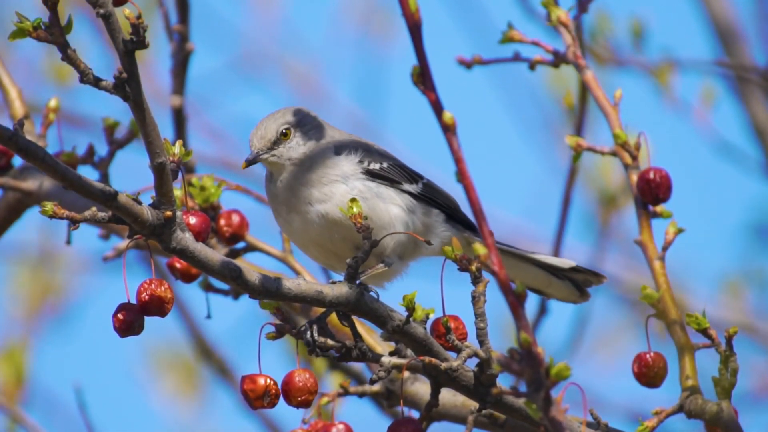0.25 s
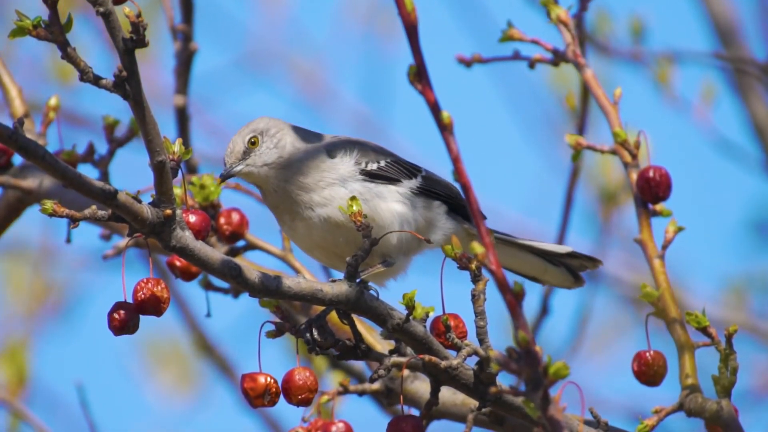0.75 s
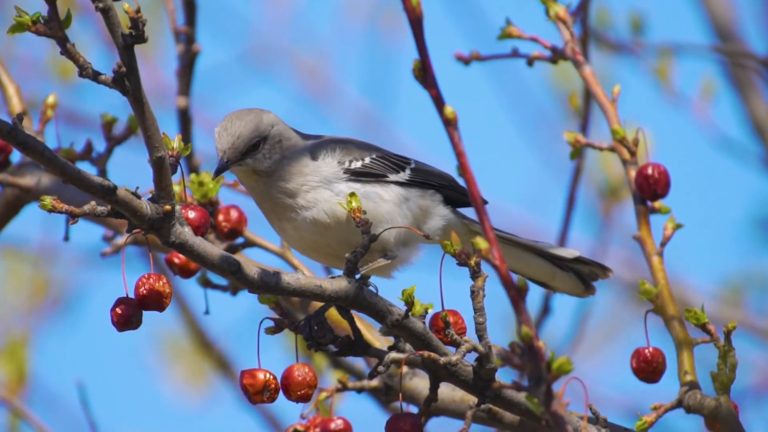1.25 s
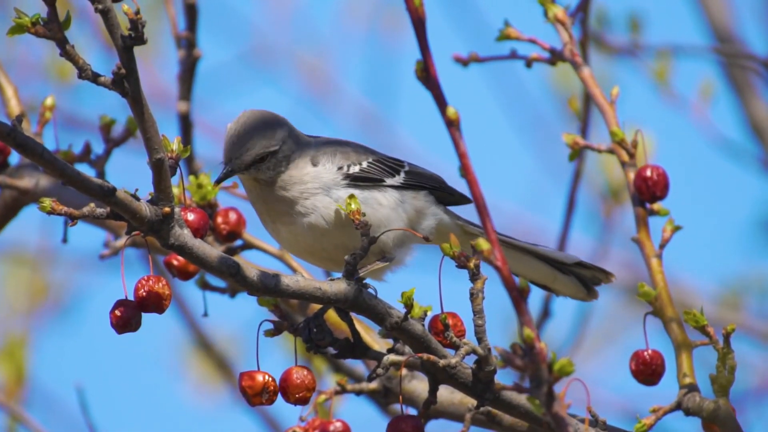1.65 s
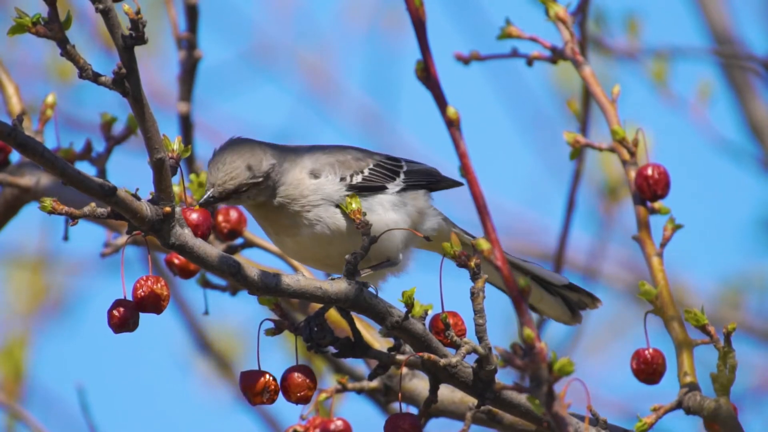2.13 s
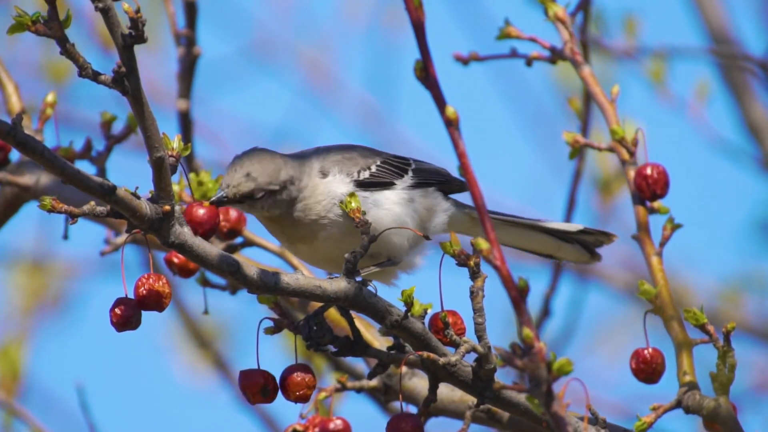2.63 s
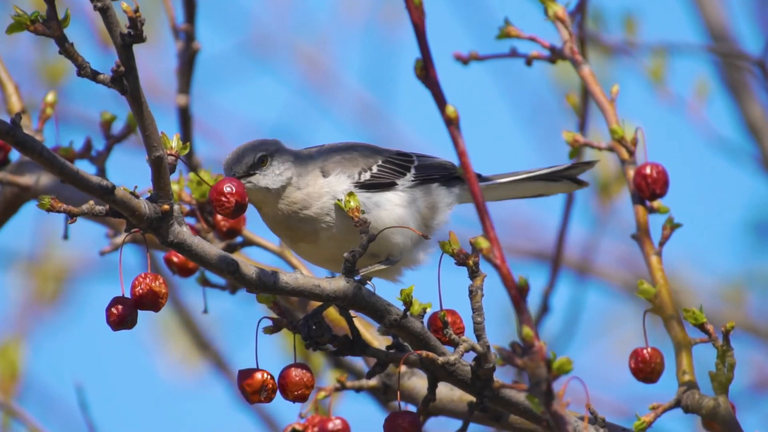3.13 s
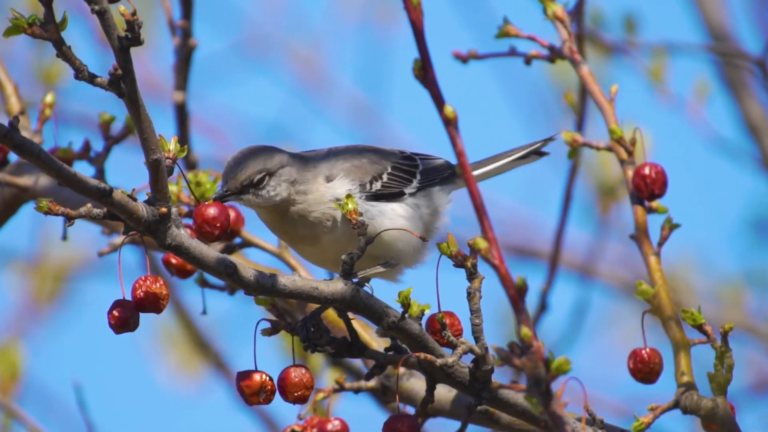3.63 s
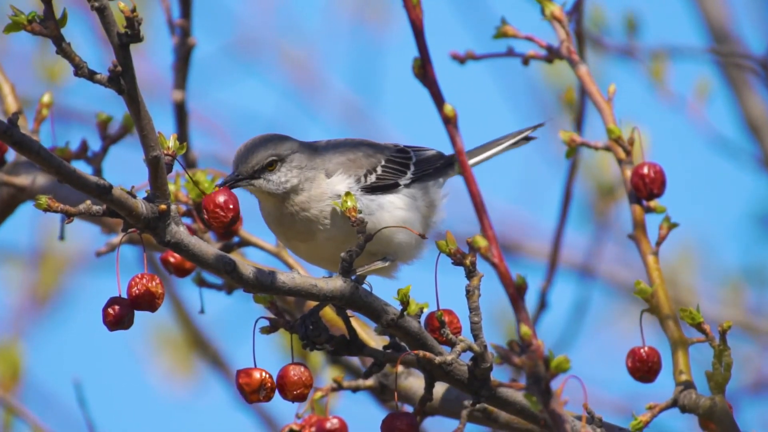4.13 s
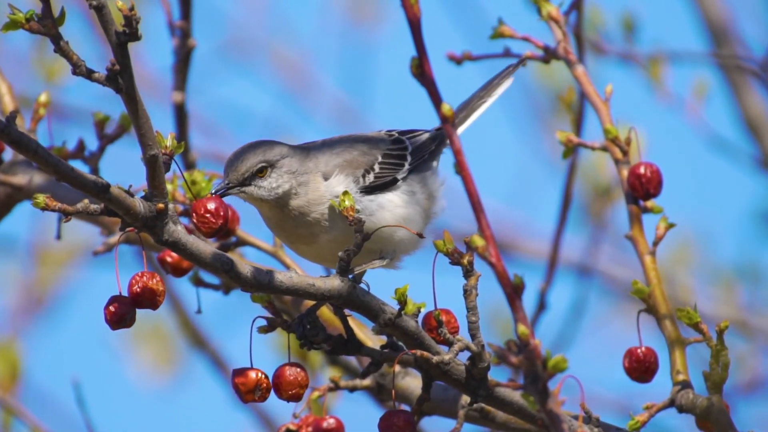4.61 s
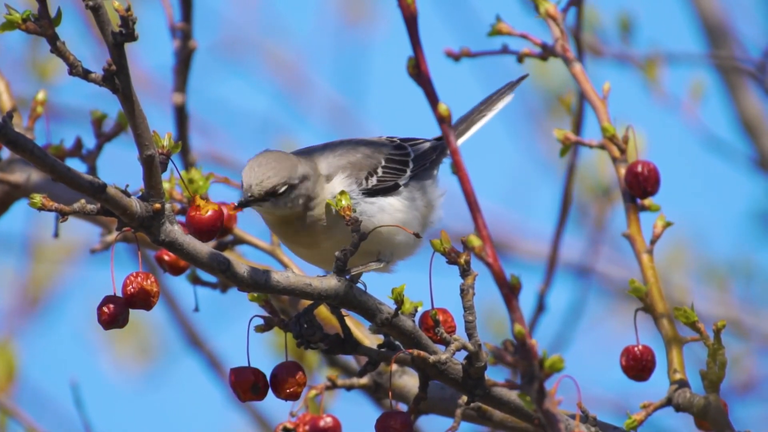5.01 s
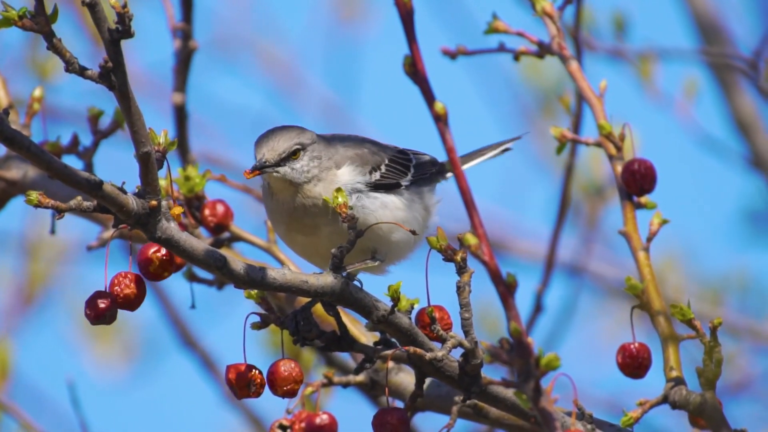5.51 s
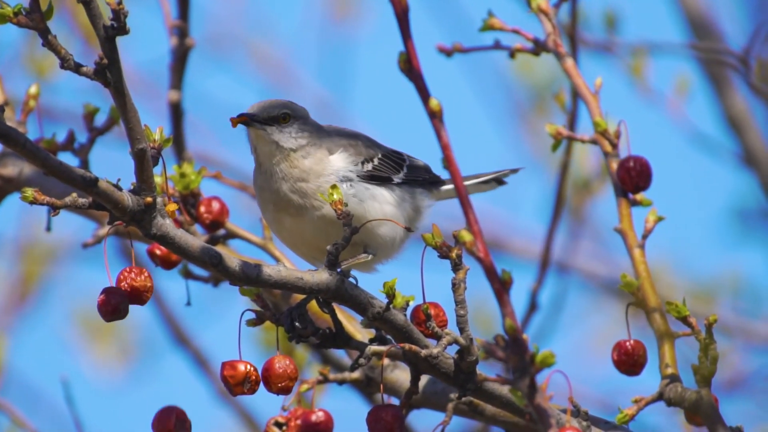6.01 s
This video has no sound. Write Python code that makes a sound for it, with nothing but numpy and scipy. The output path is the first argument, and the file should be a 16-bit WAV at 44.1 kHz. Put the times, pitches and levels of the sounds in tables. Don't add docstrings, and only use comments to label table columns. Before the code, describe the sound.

A grey songbird perched close and central sings clear, quick whistles: low paired slurs with higher answers, then cleaner falling slides, then a run of upward-flicked notes, paused once. Near twigs and trunks give a light echo. Crickets trill steadily on both sides over a high insect hiss and faint low air. Soft rodent chucks, distant wooden knocks and thin far bird calls sit behind, in natural open stereo.

```python
import sys
import numpy as np
from scipy import signal
from scipy.fft import rfft, irfft, next_fast_len
from scipy.io import wavfile
from scipy.ndimage import uniform_filter1d, map_coordinates

SR = 44100
rng = np.random.default_rng(int(sys.argv[2]) if len(sys.argv) > 2 else 0)


def convert_level_to_amplitude(level_db):
    exponent = np.asarray(level_db, float) / 20
    return 10 ** exponent


def master_out(mix):
    frames = np.transpose(np.atleast_2d(mix))
    ceiling = np.clip(frames, -1, 1)
    pcm = np.round(ceiling * 32767).astype(np.int16)
    wavfile.write(sys.argv[1], SR, pcm)


N = 276066

# share of length, height (1 first pitch, 0 last), level_db re note
FAR_SHAPE = [(0, 0.85, 0.5), (.3, 0.47, -1), (.75, 0.62, -4), (1, 0.0, -3)]


def at_hz(points, hz):
    point_hz, value = np.transpose(points)
    return np.interp(np.log(hz), np.log(point_hz), value)


def pan(x, lean_db):
    return x * convert_level_to_amplitude(np.array([[lean_db], [-lean_db]]) / 2)


def add(out, start_s, sound):
    i = round(start_s * SR)
    sound, i = sound[max(-i, 0):], max(i, 0)
    out[i:i + len(sound)] += sound[:max(len(out) - i, 0)]


def butter(x, order, hz, kind):
    return signal.sosfilt(signal.butter(order, hz, kind, fs=SR, output="sos"), x)


def drift(rate):
    slow = rng.standard_normal(int(N / SR * rate * 2) + 3)
    return map_coordinates(slow, [np.arange(N) / SR * rate * 2], order=3, mode="nearest")


def scatter(x, t60, level_db, gap_s, channels, lumpy_db=0):
    t = np.arange(SR) / SR
    echo = rng.standard_normal((channels, SR))
    clumps = uniform_filter1d(uniform_filter1d(echo, size=500), size=500)
    decay_db = lumpy_db * clumps / np.std(clumps) - 60 * t / t60
    echo = echo * convert_level_to_amplitude(decay_db) * np.clip(t / gap_s - 1, 0, 1)
    echo *= convert_level_to_amplitude(level_db) / np.sqrt(np.sum(echo ** 2, axis=1, keepdims=True))
    return signal.fftconvolve(x[None], echo, axes=1)[:, :N]


def blip(hz, length_s, fall):
    u = np.linspace(0, 1, int(length_s * SR))
    glide_hz = hz * (1 + fall * (.5 - u))
    return np.sin(np.pi * u) ** 2 * np.sin(2 * np.pi * np.cumsum(glide_hz) / SR)


def sung(shape, rows):
    notes = []
    for s, length_s, first_hz, last_hz, level_db in rows:
        notes.append([(s + share * length_s, last_hz + height * (first_hz - last_hz), level_db + db)
                      for share, height, db in shape])
    return notes


def whistle(notes, overtone_db, rasp_db, tilt_db=0, effort=None, held_db=0):
    # multiple, level_db re pitch
    overtones = [(2, -25), (3, -33), (4, -35), (5, -32.5), (6, -34.5), (7, -28)]
    # hz, gain_db
    beak = [(3000, -1), (4600, -4), (5400, -6), (6100, -9), (7400, -1), (12000, 1), (14800, -0.5),
            (15300, -2)]
    out = np.zeros(N)
    for note, (fade_db, arch_db, bright_db, octave_db) in zip(notes, effort or [(0, 0, 0, 0)] * len(notes)):
        s, pitch_hz, level_db = np.transpose(sorted(note))
        t = np.arange(s[0], s[-1], 1 / SR)
        u = (t - s[0]) / (s[-1] - s[0]) - .5
        hz = uniform_filter1d(np.interp(t, s, pitch_hz), size=24, mode="nearest")
        phase = 2 * np.pi * np.cumsum(hz) / SR

        linger = np.exp(-1 / (0.029 * SR))
        shaken = signal.lfilter([1 - linger], [1, -linger], np.abs(np.gradient(hz)))
        noise = rng.standard_normal(SR // 8)[:len(t)]
        flutter = 4 * signal.lfilter(*signal.butter(2, 1300, fs=SR), noise)
        rasp = convert_level_to_amplitude(rasp_db) * shaken * flutter
        tone = (1 + rasp) * np.sin(phase)

        wobble_rad = .3 * uniform_filter1d(flutter, size=200)
        note_db = np.interp(t, s, level_db)
        swing_db = .4 * (note_db - level_db.max() + 1.0)
        still = np.exp(-shaken / .1)
        for k, db in overtones:
            patches = np.interp(t, np.linspace(s[0], s[-1], 9), rng.standard_normal(9))
            patch_db = tilt_db * (k - 3) + 3.5 * patches + bright_db
            patch_db += held_db * max(k - 3, 0) * still
            if k == 2:
                patch_db += octave_db + .5 * held_db * still
            gain_db = db + overtone_db + swing_db + np.minimum(patch_db, 12) + at_hz(beak, k * hz)
            blurred = phase + 2.5 * rasp + .03 * flutter + wobble_rad
            tone += convert_level_to_amplitude(gain_db) * (k * hz < 15700) * np.sin(k * blurred)

        edge = np.clip(np.minimum(t - s[0], s[-1] - t) / .0015, 0, 1)
        envelope_db = note_db + fade_db * u + arch_db * (np.cos(np.pi * u) - .7)
        add(out, s[0], np.sqrt(2) * convert_level_to_amplitude(envelope_db) * edge * tone)
    return out


def paired_slurs():
    # share of length, height (1 first pitch, 0 last), level_db re note
    lead_shape = [(0, 0.41, -23), (.15, 0.716, -12), (.33, 1, -3), (.7, 0.22, 0), (.85, 0.11, -3.5),
                  (.94, 0.22, -2.5), (1, 0.047, -9.5)]
    answer_shape = [(0, 0.94, -9), (.1, 0.914, -4.5), (.35, 0.493, 1), (.6, .2, -4), (.75, 0.095, -2.5),
                    (.87, 0.086, -4), (1, 0.046, -22)]
    high_shape = [(0, 1.1, -39), (.13, 1.2, -4), (.4, 0.46, 1), (.8, 0.009, 0), (1, 0.18, -7)]
    straight_shape = [(0, 1.07, -23), (.13, 1.01, -1), (.4, 0.62, 3.5), (.8, 0.25, -1.5), (.9, .05, -4.5),
                      (1, 0.052, -27)]
    hump_shape = [(0, .8, -7), (.08, 0.96, -8), (.22, 0.903, -4), (.42, 0.33, 0), (.6, .12, -4.5),
                  (.85, 0.011, -6.5), (1, 0.096, -18)]
    early_lead_shape = [(0, .5, -26), (.13, 1.0, -8), (.33, 0.89, -0.5), (.6, 0.72, -2.5), (.85, .05, -1),
                        (.94, 0.028, -7), (1, 0.081, -21)]
    # start_s, length_s, first_hz, last_hz, level_db
    lead_rows = [(-.045, 0.073, 2300, 1982, -15), (1.3998, 0.059, 2204, 1968, -17),
                 (1.701, 0.064, 2250, 1948, -18), (2.2935, 0.059, 2303, 1953, -17.5)]
    answer_rows = [(0.021, 0.062, 2526, 1986, -15.5), (1.172, 0.068, 2587, 2026, -18.5),
                   (1.4617, 0.055, 2344, 2048, -18), (1.7704, 0.051, 2470, 2064, -16)]
    high_rows = [(0.131, 0.049, 3187, 2983, -15.5), (1.278, 0.029, 3183, 2932, -13.5),
                 (1.5636, 0.036, 3067, 2853, -14)]
    straight_rows = [(1.873, 0.04, 3428, 2887, -16.5), (2.1746, 0.043, 3380, 2670, -13.5),
                     (2.4529, .035, 3426, 2786, -15)]
    hump_rows = [(2.0658, 0.063, 2545, 2087, -13), (2.3551, 0.063, 2551, 2050, -16.5)]
    early_lead_rows = [(1.1178, 0.055, 2300, 1994, -16), (2.003, 0.065, 2313, 2008, -14.5)]
    # fade_db start to end, arch_db mid-note, overtones_db, octave_db
    slur_effort = [(-5, -5, 1, -2), (2, -4, 0, -3.5), (-4.5, 4, 1.5, 3), (3, 1, 0.8, 1), (6, -2.5, -3, -4),
                   (-7.5, 7, -0.5, -5), (4.5, -1.5, 2, -1.5), (2, -4.5, 3.5, -9), (-6.5, 4, 2, -16),
                   (5, -1, 1.5, -10), (-5, -3.5, 4.5, -8), (-2, -1, -0.5, -1), (-1.5, 0, -0.5, -2),
                   (0, 0.5, 3, -2), (6, -6, 4, -4.5), (-1, 1, 3.5, -1.5), (-3, 1.5, -12, -1),
                   (1, -1, 2.5, 0.5)]
    notes = sung(lead_shape, lead_rows) + sung(answer_shape, answer_rows) + sung(high_shape, high_rows)
    notes += sung(straight_shape, straight_rows) + sung(hump_shape, hump_rows)
    notes += sung(early_lead_shape, early_lead_rows)
    return whistle(notes, overtone_db=-2.0, rasp_db=-18.5, effort=slur_effort)


def second_voice():
    # share of length, height (1 first pitch, 0 last), level_db re note
    drop_shape = [(0, 1, -4.5), (.2, .75, -0.5), (.45, 0.41, -7.5), (.7, 0.16, -15.5), (1, 0.094, -15)]
    grace_shape = [(0, 0.85, -3), (.55, .45, 6.5), (1, 0.0, 4)]
    # start_s, length_s, first_hz, last_hz, level_db
    drop_rows = [(0.163, 0.036, 2460, 1620, -27), (1.307, 0.026, 2520, 1640, -24),
                 (1.593, 0.049, 2320, 1520, -26), (1.908, 0.035, 2340, 1604, -23),
                 (2.209, .02, 2570, 2120, -36), (2.486, 0.028, 2505, 1610, -20)]
    grace_rows = [(.001, .01, 3250, 2970, -36.5), (.057, .018, 3100, 3020, -40.5),
                  (.16, .016, 3600, 3650, -46), (.164, .014, 5300, 5250, -52),
                  (1.144, .028, 3900, 2850, -52), (1.553, .0082, 2850, 3950, -50),
                  (1.59, .012, 5150, 5100, -50), (1.602, .02, 3250, 3300, -46),
                  (1.758, .014, 3800, 3150, -51), (1.822, .016, 4500, 3600, -51),
                  (1.824, .012, 2250, 2050, -36), (2.166, .009, 2700, 4100, -45),
                  (3.274, .012, 2650, 2750, -44), (3.405, .012, 2850, 2850, -30),
                  (4.335, .008, 3750, 3300, -36), (5.914, .008, 3350, 3050, -38)]
    notes = sung(drop_shape, drop_rows) + sung(grace_shape, grace_rows)
    return whistle(notes, overtone_db=4.5, rasp_db=-17.5)


def falling_slides():
    # share of length, height (1 first pitch, 0 last), level_db re note
    slide_shape = [(0, 1.0, -24), (.14, 0.98, -2.5), (.35, .7, 1), (.5, .5, -0.5), (.78, 0.098, -9.5),
                   (.86, 0.0, -17), (.93, 0.21, -19.5), (1, 0.71, -11)]
    swoop_shape = [(0, 1, -16.5), (.2, 0.51, -1), (.4, 0.157, -1), (.6, 0.06, -1.5), (.78, 0.0, -9.5),
                   (.9, 0.064, -24), (1, 0.45, -28)]
    long_shape = [(0, 0.58, -34), (.157, 1.0, -7.5), (.34, .55, -0.5), (.55, .25, -3.5), (.77, 0.0, -8),
                  (.915, 0.16, -10), (1, 1.8, -17)]
    late_shape = [(0, .7, -30), (.146, 1.0, -3), (.3, .9, -3), (.475, .62, -0.5), (.79, 0.0, -18),
                  (.92, 0.56, -19), (1, 1.94, -8)]
    dive_shape = [(0, 0.97, -13.5), (.25, 0.63, -2.5), (.5, .35, 0), (.78, 0.116, -7.5), (.9, 0.0, -11),
                  (1, 0.09, -52)]
    # start_s, length_s, first_hz, last_hz, level_db
    slide_rows = [(3.1207, 0.075, 3034, 2260, -14.5), (3.4612, 0.07, 3060, 2170, -13.5)]
    swoop_rows = [(3.1948, 0.054, 3760, 2973, -11), (3.3614, 0.052, 3905, 2870, -12)]
    long_rows = [(3.279, 0.082, 2920, 2256, -12.5)]
    late_rows = [(3.6311, .0854, 2974, 2170, -13)]
    dive_rows = [(3.539, 0.047, 3870, 2730, -11), (3.7153, 0.047, 3810, 2813, -10)]
    # fade_db start to end, arch_db mid-note, overtones_db, octave_db
    slide_effort = [(-2.5, .3, 2.2, 6), (-1.4, .3, 2.5, 2), (-0.037, .3, -1.5, 6), (-1.3, .3, 2, 0),
                    (.3, .3, 1.7, -1.5), (0.03, .3, 0.5, 12), (-1.7, .3, 1.5, 0), (.3, .3, -1.5, 6)]
    notes = sung(slide_shape, slide_rows) + sung(swoop_shape, swoop_rows)
    notes += sung(long_shape, long_rows) + sung(late_shape, late_rows) + sung(dive_shape, dive_rows)
    return whistle(notes, overtone_db=-3.0, rasp_db=-42, tilt_db=-1.0, effort=slide_effort)


def flicked_notes():
    # flick_s, held_hz, top_hz, end_hz, level_db
    flick_rows = [(4.3759, 3005, 4150, 2610, -14.5), (4.4959, 2980, 3760, 2610, -13),
                  (4.6076, 2995, 3900, 2723, -14), (4.723, 3100, 3807, 2748, -14.5),
                  (4.837, 3017, 3970, 2615, -13.5), (5.461, 3054, 3756, 2737, -14),
                  (5.584, 3028, 3770, 2660, -14), (5.699, 2986, 3570, 2715, -13),
                  (5.83, 2988, 3880, 2740, -14.5), (5.9571, 3055, 4055, 2750, -14),
                  (6.08, 2986, 3773, 2610, -14)]
    # s from flick, level_db re note
    flick_swell = [(-.047, -34), (-.040, -14.5), (-.034, -3.5), (-.027, -1.5), (-.015, -1.5)]
    # s from flick, height (0 held, 1 top, -1 end pitch), level_db re note
    flick_shape = [(-.009, 0.1, -0.5), (-.0045, 0.388, 0.5), (0, 1.056, -4.5), (.0045, 0.105, 1.5),
                   (.0075, -0.247, 0), (.015, -0.636, 0), (0.028, -1.03, -3), (.031, -1.16, -4),
                   (.036, -1.6, -38)]
    flick_holds = [0.97, 0.94, 0.97, 1.07, .93, 0.98, 1.03, 1.03, 1.04, .99, 1.1]
    flick_falls = [0.96, 0.84, 0.96, 0.96, 0.76, 1.06, 0.81, 0.91, 0.98, 0.94, 1.1]
    # fade_db start to end, arch_db mid-note, overtones_db, octave_db
    flick_effort = [(.3, 1.5, 1.5, -1), (.3, -2.5, 0.98, -4), (.3, -1.5, -0.63, 1), (6.7, 2, -0.18, 4),
                    (.3, -3, -1.6, 2.5), (.3, 1.5, -0.41, 2.5), (.3, -2.5, -1.9, 4), (.3, -4.5, -1.5, 5.5),
                    (2.5, -3, -1.25, 4), (0.8, -7.5, -2.2, 3), (0.26, 0.5, -1.8, 4.5)]
    notes = []
    for (s, held_hz, top_hz, end_hz, level_db), hold, fall in zip(flick_rows, flick_holds, flick_falls):
        lag_s, height, db = np.transpose(flick_shape)
        lag_s = np.where(lag_s > .01, fall, 1) * lag_s
        pitch_hz = held_hz + height * np.where(height > 0, top_hz - held_hz, held_hz - end_hz)
        swell = [(s + hold * lead_s, held_hz, level_db + lead_db) for lead_s, lead_db in flick_swell]
        notes.append(swell + list(zip(s + lag_s, pitch_hz, level_db + db)))
    flicks = whistle(notes, overtone_db=-1.0, rasp_db=-25.5, tilt_db=-2.5, effort=flick_effort, held_db=-5.1)
    return butter(flicks, 4, 2000, "high")


def songbird():
    # delay_s, level_db
    echo_rows = [
        (.108, -47),
        (.153, -49.5),
    ]
    voice = paired_slurs() + second_voice() + falling_slides() + flicked_notes()
    effort = uniform_filter1d(np.abs(voice), size=90) * convert_level_to_amplitude(4 * drift(21))
    breath = butter(rng.standard_normal(N), 4, [10500, 15000], "band")
    voice += convert_level_to_amplitude(-49) * effort * breath
    voice = butter(voice, 4, 1400, "high")
    twigs = scatter(voice, t60=0.065, level_db=-11, gap_s=0.0017, channels=1)
    twigs = 1.4 * butter(twigs, 1, 2600, "high")
    trunks = scatter(voice, t60=0.44, level_db=-30, gap_s=0.024, channels=1, lumpy_db=2.5)
    for delay_s, db in echo_rows:
        add(trunks[0], delay_s, convert_level_to_amplitude(db) * (voice + twigs[0]))
    return np.repeat(voice + twigs + trunks, 2, axis=0)


def wide_noise(spectrum, level_db, patchy_db):
    # hz, left-right likeness
    likeness = [(60, 0.87), (125, 1), (250, 0.68), (700, 0.41), (3000, 0.7), (6000, 0.081), (12000, 0.092)]
    # hz, left minus right_db
    leaning = [(60, -12), (150, -1), (300, -2.5), (800, -3.5), (3000, -0.5), (8000, -1)]
    size = next_fast_len(N)
    hz = np.maximum(np.arange(size // 2 + 1) * SR / size, 1)
    mid, side = rfft(rng.standard_normal((2, size))) * convert_level_to_amplitude(at_hz(spectrum, hz))
    alike = np.clip(at_hz(likeness, hz), 0, 1)
    lean = convert_level_to_amplitude(at_hz(leaning, hz) / 2)
    mid, side = np.sqrt(1 + alike) * mid, np.sqrt(1 - alike) * side
    out = irfft(np.array([(mid + side) * lean, (mid - side) / lean]), size)[:, :N]
    return out / np.std(out.mean(0)) * convert_level_to_amplitude(level_db + patchy_db * drift(0.935))


def air_and_haze():
    # hz, density_db
    air = [(18, -100), (40, -67), (183, -22.5), (241, -11.5), (338, -4), (494, -3.5), (649, -4.5),
           (1030, -6.5), (1220, -9), (2300, -12), (2720, -10.5), (2960, -12.5), (4600, -12), (5980, -36),
           (10100, -120)]
    # hz, density_db
    haze = [(2590, -33), (4400, -28), (5070, -7.5), (5730, -8), (6170, -5.5), (6430, -14.5), (6680, -13.5),
            (6960, -7.5), (7380, -8.5), (8120, -24), (9560, -25.5), (13200, -26), (14400, -24.5),
            (15500, -20.5)]
    floor = wide_noise(air, -52.5, patchy_db=.4) + wide_noise(haze, -49, patchy_db=-.5)
    return butter(floor, 2, 110, "high")


def trillers():
    # pitch_hz, pulses_per_s, pulse_s, scatter_hz, level_db, left minus right_db
    trill_rows = [
        (7150, 50.5, 0.0087, 116, -60.5, 21),
        (5300, 74, 0.0073, 260, -60, 4),
        (7280, 170, 0.0074, 67, -65, 4),
    ]
    out = 0
    for hz, rate, length_s, spread_hz, level_db, lean_db in trill_rows:
        trill, chance = np.zeros(N), rng.standard_normal((500, 3))
        for k, (late, sharp, strong) in enumerate(chance):
            pulse = blip(hz + spread_hz * sharp, length_s, fall=0.021)
            add(trill, k / rate + .0015 * late, convert_level_to_amplitude(strong) * pulse)
        trill *= convert_level_to_amplitude(level_db + 9.0)
        out = out + pan(trill, lean_db) + scatter(trill, t60=0.099, level_db=1.5, gap_s=0.0011, channels=2)
    return out


def wing_stroke(sharp_hz):
    stroke_s, stroke_hz, droop_hz = 0.01473, 6310, 900
    u = np.linspace(0, 1, int(stroke_s * SR))
    hz = stroke_hz + sharp_hz - droop_hz * u ** 3.76
    return np.sin(np.pi * u) ** 1.06 * np.sin(2 * np.pi * np.cumsum(hz) / SR)


def near_cricket():
    # start_s, chirps until next run
    chirp_runs = [(.002, 1), (.133, 2), (.484, 3), (.939, 2), (1.289, 2), (1.617, 4), (2.312, 1),
                  (2.464, 1), (2.63, 1), (2.811, 1), (2.978, 2), (3.282, 2), (3.622, 1), (3.774, 3),
                  (4.296, 1), (4.444, 5), (5.294, 1), (5.455, 5), (6.299, 1)]
    out = np.zeros(N)
    runs = zip(chirp_runs, chirp_runs[1:])
    starts = np.concatenate([np.linspace(s, end, count, endpoint=False) for (s, count), (end, _) in runs])
    for start, following in zip(starts, np.append(starts[1:], chirp_runs[-1][0])):
        gap_s = following - start
        strokes = max(round(gap_s / .0217) - 1, 1)
        for s in start + np.arange(strokes) * gap_s / (strokes + 1):
            add(out, s - .0075, convert_level_to_amplitude(-44 + rng.normal(0, 1.65)) * wing_stroke(rng.normal(0, 30)))
    return pan(out, -10) + scatter(out, t60=.2, level_db=-11, gap_s=.003, channels=2)


def in_wood(x, lean_db):
    return pan(x, lean_db) + scatter(x, t60=0.85, level_db=-3.5, gap_s=0.0029, channels=2)


def rodent_chucks():
    # peak_s, peak_db, pitch_hz
    chuck_rows = [(0.101, -32.5, 1181), (0.7378, -32.5, 1184), (1.714, -33, 1185), (2.5769, -33.5, 1164),
                  (3.176, -33.5, 1200), (4.2544, -32.5, 1201), (5.085, -33, 1210), (5.875, -30.5, 1188)]
    out = np.zeros(N)
    for s, db, hz in chuck_rows:
        add(out, s - .0065, convert_level_to_amplitude(db + 1.05) * blip(1.03 * hz, length_s=0.0176, fall=0.45))
    return in_wood(out, -3.5)


def far_knocks():
    # peak_s, peak_db
    knock_rows = [(0.833, -40), (0.995, -38), (1.207, -43), (1.378, -36), (1.564, -35), (1.761, -35.5),
                  (1.961, -36.5), (2.156, -38), (2.36, -40), (2.565, -39), (2.758, -39.5), (5.61, -43)]
    out = np.zeros(N)
    for s, db in knock_rows:
        add(out, s - .004, convert_level_to_amplitude(db - 7.5) * blip(806, length_s=0.019, fall=0.08))
        add(out, s, convert_level_to_amplitude(db - 7) * blip(2200, length_s=.002, fall=.3))
    return in_wood(out, -7.0)


def far_birds():
    # start_s, length_s, first_hz, last_hz, level_db
    far_rows = [(.3612, 0.027, 9640, 7220, -46), (0.52, 0.018, 8070, 7540, -63),
                (2.7286, 0.03, 7600, 8320, -47), (3.625, 0.03, 7100, 7620, -41),
                (4.3518, 0.043, 7290, 7690, -34.5), (.665, 0.07, 9660, 9460, -66),
                (1.49, 0.045, 9500, 7800, -57), (4.175, 0.018, 7400, 8300, -57),
                (6.225, 0.03, 7400, 8500, -53), (4.985, .015, 7400, 8600, -64)]
    hook_rows = [
        (0.9864, 0.028, 8900, 7490, -26),
        (3.913, 0.036, 7950, 7090, -38.5),
    ]
    hook_shape = [(0, 1.0, -21), (.25, .38, -5.5), (.75, 0.022, -0.5), (1, 0.089, 5)]
    far_pan_db = [-7.5, -6, 18, -1, 12, 0, -6.5, -6.5, 1, 2, 9, 22.5]
    notes = sung(FAR_SHAPE, far_rows) + sung(hook_shape, hook_rows)
    calls = [whistle([note], overtone_db=5, rasp_db=-34) for note in notes]
    direct = sum(pan(call, db) for call, db in zip(calls, far_pan_db))
    wet = sum(call * (np.max(call) / 0.06) ** -.45 for call in calls)
    near = scatter(wet, t60=0.18, level_db=-2.5, gap_s=0.0011, channels=2)
    return direct + near + scatter(wet, t60=0.41, level_db=-6.5, gap_s=0.012, channels=2)


def dry_clicks():
    # start_s, peak_db, centre_hz
    click_rows = [(.996, -40.5, 2000), (0.834, -46, 2200), (1.962, -40, 2262), (2.757, -43, 2200),
                  (4.989, -52, 9900), (5.806, -48, 1780)]
    out, t = np.zeros(N), np.arange(600) / SR
    for s, db, hz in click_rows:
        burst = rng.standard_normal(len(t)) * np.exp(-t / 0.0062)
        burst = butter(burst, 2, [hz / 3.6, hz * 1.65], "band")
        add(out, s, convert_level_to_amplitude(db) * burst * np.sqrt(SR / hz / 4))
    return pan(out, -11)


def far_coo():
    # start_s, length_s, first_hz, last_hz, level_db
    coo_rows = [
        (4.93, .12, 1900, 1850, -67),
        (5.05, .12, 1860, 1790, -68),
    ]
    coo = whistle(sung(FAR_SHAPE, coo_rows), overtone_db=25, rasp_db=-5, tilt_db=-8)
    return scatter(coo, t60=0.18, level_db=6.0, gap_s=0.003, channels=2)


def scene():
    insects = air_and_haze() + trillers() + near_cricket()
    neighbours = rodent_chucks() + far_knocks() + far_birds() + dry_clicks() + far_coo()
    return songbird() + insects + neighbours


def top_cut(x):
    return signal.sosfilt(signal.butter(12, 15680, fs=SR, output="sos"), x)


def record(dry):
    pop_db, pop_s = -25, 0.00026
    pop = convert_level_to_amplitude(pop_db) * np.exp(-np.arange(N) / SR / pop_s)
    lopsided = dry + convert_level_to_amplitude(-65) * dry ** 2
    top = signal.cheby2(10, 50, 15850, fs=SR, output="sos")
    return top_cut(signal.sosfilt(top, lopsided + pop))


dry = scene()
out = record(dry)
master_out(out)
```